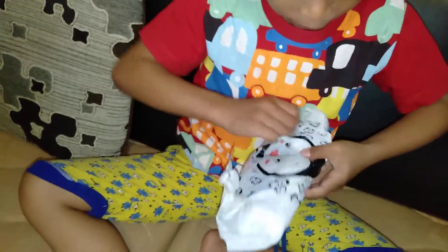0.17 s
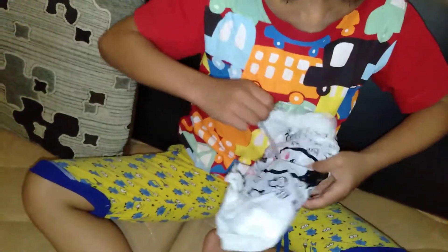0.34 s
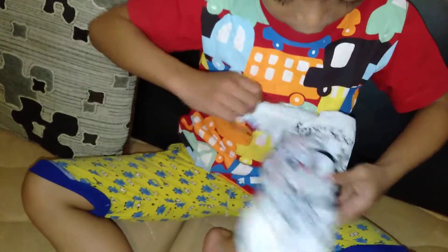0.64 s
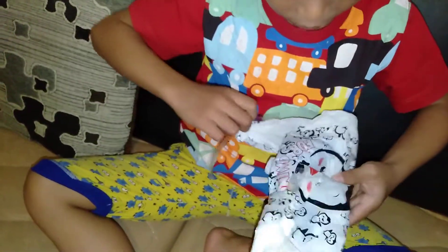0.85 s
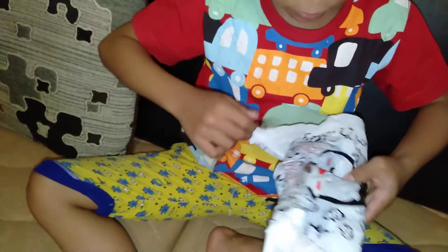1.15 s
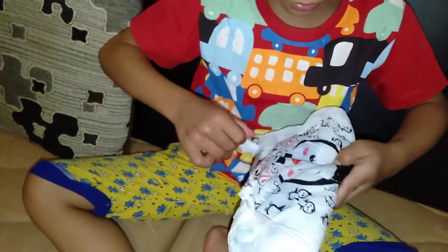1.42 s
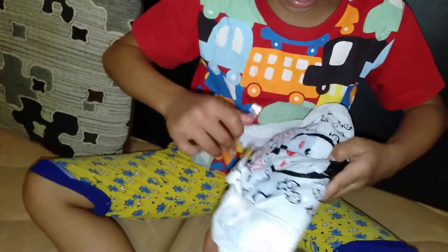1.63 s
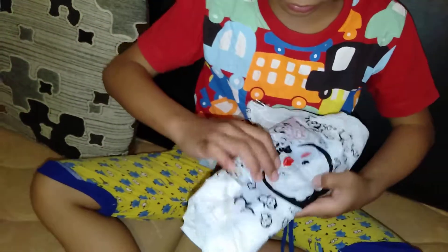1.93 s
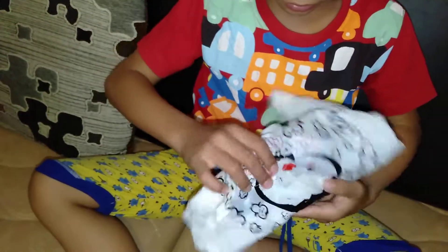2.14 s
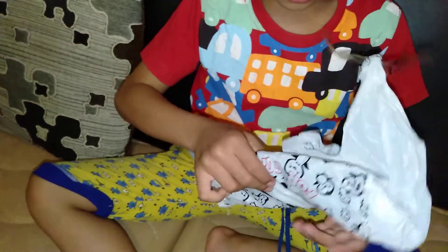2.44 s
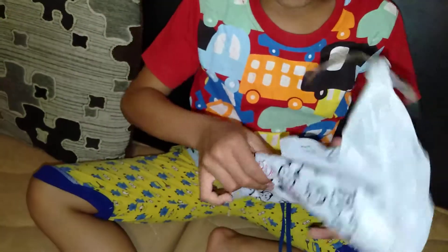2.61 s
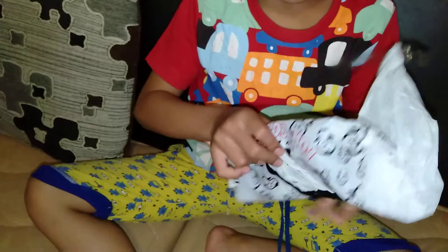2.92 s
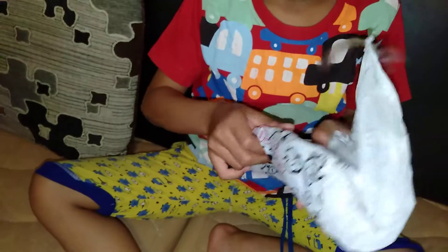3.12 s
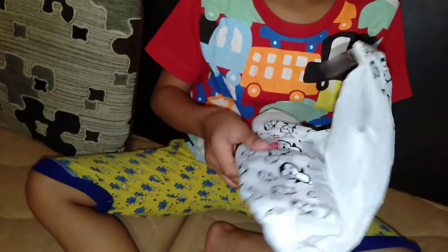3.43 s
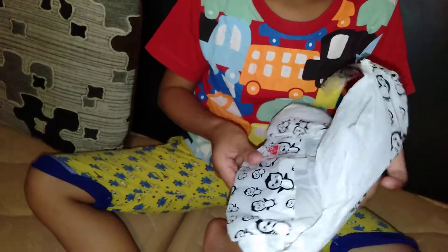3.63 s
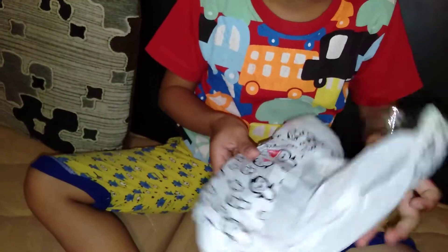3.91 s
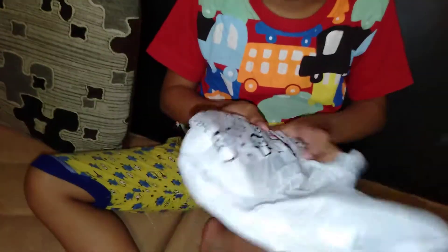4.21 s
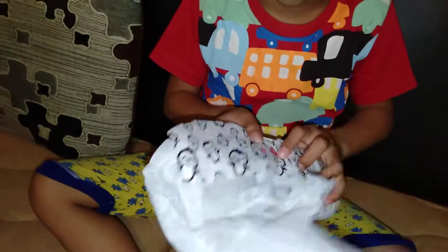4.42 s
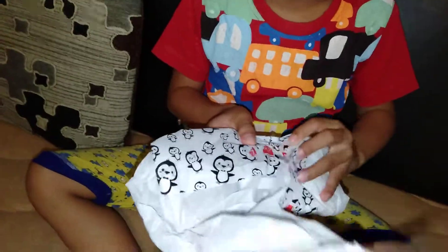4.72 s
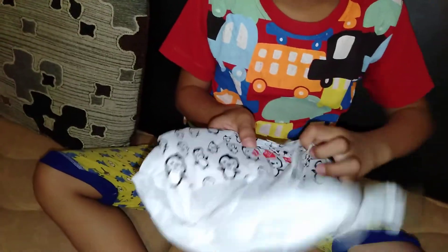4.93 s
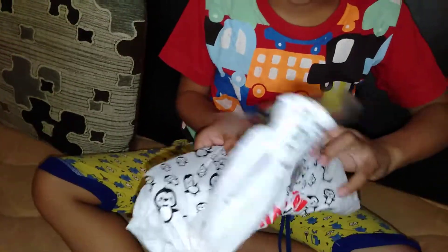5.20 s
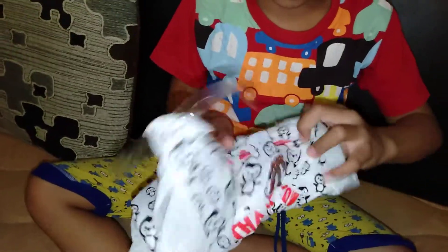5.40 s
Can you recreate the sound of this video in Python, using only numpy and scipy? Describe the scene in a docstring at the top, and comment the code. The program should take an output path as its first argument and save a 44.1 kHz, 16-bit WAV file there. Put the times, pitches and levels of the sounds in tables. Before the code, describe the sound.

Hands tear and handle crisp wrapping paper close to the microphone: loud opening crackle, quiet sparse crinkling, then a brief tear near the end.

```python
"""Hands pull thin gift paper off a parcel in a small hard-walled room, close to a phone.
It opens with a rip, a quick run of snaps: noise bursts coloured as paper and rung by its panels.
A freed flap answers in gliding tones, then sparser, softer snaps pass until a last short rip near the end.
Throughout, random lesser snaps and a rustle of tiny buckles follow the handling; the room adds a
short noise tail to all the paper, over a low steady rumble of filtered noise."""
import sys
import numpy as np
from scipy import signal
from scipy.fft import rfft, irfft
from scipy.io import wavfile

SR = 44100
rng = np.random.default_rng(int(sys.argv[2]) if len(sys.argv) > 2 else 0)


def dump_mix(stems):
    """Bounce the given channels to the path in sys.argv[1] as a 16-bit WAV at rate SR."""
    frames = np.atleast_2d(stems).T  # one column per channel
    limited = np.clip(frames, -1, 1)  # hard clip at full scale
    pcm = np.round(limited * 32767).astype(np.int16)
    wavfile.write(sys.argv[1], SR, pcm)


N = 245195

# how hard the sheet is handled: t/s, rustle level before flicker and scale shares/dB
HANDLING = [(0.0, -60.5), (0.21, -54), (0.28, -41.5), (0.35, -41.5), (0.54, -63.5), (0.6, -56),
            (0.64, -48.5), (0.86, -62), (0.94, -70), (0.99, -63), (1.09, -71.5), (1.14, -64.5),
            (1.25, -68.5), (1.29, -60.5), (1.5, -69), (1.66, -73), (1.83, -71.5), (1.88, -58), (2.1, -56.5),
            (2.17, -56.5), (2.47, -61.5), (2.62, -77), (2.66, -67.5), (2.78, -65.5), (2.81, -60.5),
            (2.94, -59.5), (3.04, -56), (3.3, -52), (3.59, -55), (4.0, -55.5), (4.04, -61), (4.205, -64),
            (4.23, -48), (4.32, -59), (4.58, -50), (4.86, -54), (4.89, -47.5), (4.98, -48.5), (5.28, -56.5),
            (5.45, -47.5), (5.56, -45)]
# scales of buckling, from whole panels to fibres: low f/Hz, high f/Hz, rustle share/dB,
# fullness weight/1, buckle t60/ms, size spread/dB (below zero counts as none)
BUCKLE_SCALES = [(382, 1486, -13, 0.91, 6, 1), (1430, 4660, -5.5, 0.76, 63, -2.5),
                 (4660, 9100, 0.5, 0.27, 18, 18), (9840, 15270, -1, 0.44, 12, -16)]


def clear_snaps(responses):
    """The clearest single creases, each a sudden buckle of the sheet at its own moment."""
    # t/s, crackle level (rms over 3 ms)/dB, then relative to it thump level/dB, crease level/dB,
    # fibre level/dB; panel pitch f/Hz
    snap_rows = [(0.1247, -34, -17, -16, 5, 2710), (0.152, -44, -3.5, -1, 5, 1610),
                 (0.1696, -46, -3.5, 3, 6, 1700), (0.178, -47, 0, 8, -13, 1620),
                 (0.2376, -32.5, -30, 3.5, 5.5, 2810), (0.2446, -29.5, -32, -14, -4, 2760),
                 (0.259, -41.5, -8, 2, 10, 2800), (0.2678, -32, -13.5, -11, 5, 4480),
                 (0.2813, -33, -19, -28, -4, 2690), (0.2872, -32, -7, -2.5, 2, 3900),
                 (0.2953, -38, -6, -5, 3, 744), (0.3053, -35, -7.5, -14, -8, 940),
                 (0.313, -38.5, -11, 2, 7, 4000), (0.3244, -40, -5, -4, 4, 786),
                 (0.3348, -36, -19, 0, 0, 1690), (0.3381, -33, -11, -4, 4, 3900),
                 (0.3482, -37.5, -25, 4, 3, 4520), (0.3706, -38.5, -11.5, 3.5, 6.5, 2630),
                 (0.3871, -39.5, -29, 2, 1, 1670), (0.6121, -33, -3, -1.5, 5.5, 1780),
                 (0.6213, -41, -3, 1, 12, 1620), (0.6302, -40, -5, 4, 3, 1760),
                 (0.6351, -30, -20, -7.5, -2, 4500), (1.0405, -45, -15, -14, 3, 4460),
                 (1.1, -58.5, -24, -19, 2, 2690), (1.1221, -54, -19, -16, -2, 4390),
                 (1.1394, -59.5, 1, -10, 0, 885), (1.354, -50, -17, -24, -18, 780),
                 (1.3747, -52, -1.5, -16, -2, 530), (1.4081, -53.5, -10, -5, -7, 500),
                 (1.436, -48, -6.5, -6, 3, 475), (1.5503, -68.5, 8, -6, -10, 850),
                 (1.6138, -54.5, -12, -10, -3, 4480), (1.6407, -58, -14, -17, -3, 780),
                 (1.7393, -54, -16, -12, -2, 3880), (1.8704, -46.5, -15, -6.5, 0, 3040),
                 (1.9264, -45, -23, -17, -16, 3920), (1.9679, -49.5, -2.5, 1, 2, 3630),
                 (1.9869, -60.5, 10.5, -6, -4, 523), (2.0086, -51, -4, -4, -8, 494),
                 (2.2194, -47, -9, -13, -6, 4010), (2.4997, -50, -19, -7, 1, 1660),
                 (2.6407, -49, -7, -4, -18, 1340), (2.7186, -51.5, -24, -7, -6, 3010),
                 (2.8104, -47.5, -22, -9, 0, 3060), (2.8209, -52, -9, -7, -4, 4010),
                 (2.8562, -47.5, -22, -11, -10, 3190), (2.8839, -62.5, 12, -1, 0, 1530),
                 (2.922, -54, -10, -20, -10, 1170), (3.5634, -51.5, -3.5, -19, 6, 3060),
                 (4.1049, -51, -16, -16, 0, 1080), (4.1427, -48, -10.5, -20, -7, 517),
                 (4.178, -50, -10, -16, -10, 2580), (4.2137, -51, -22, -17, -8, 4480),
                 (4.2332, -49.5, -7, -9, 2, 3040), (4.7696, -52.5, 0, 4, -3, 1690),
                 (4.7908, -52.5, 0.5, 5.5, 4, 4560), (4.892, -54, 4, -3, 0, 1490),
                 (4.9662, -53.5, 7.5, -4, -2, 1590), (5.0701, -37, -3.5, 2, -4, 4800),
                 (5.0865, -52.5, -19, 12.5, -1, 2330), (5.092, -36.5, -27, -3, -6, 2900),
                 (5.1006, -44, -20, -6, -6, 3830), (5.136, -53, -20, 8, 3, 2510),
                 (5.154, -45, -30, -2, -3, 2990), (5.2512, -47.5, -28, -8, -6, 3570),
                 (5.4332, -53.5, 7.5, -17, -8, 1190)]
    return snap_train(snap_rows, responses)


def lesser_snaps(responses, per_s=45.0):
    """Many lesser creases at random moments, their size set by the handling."""
    over_rustle_db, spread_db = 1, 1
    scales_db, scale_spread_db = [-15.5, -12.5, -4.5], 3.5  # thump, crease, fibre against the crackle
    panel_low_hz, panel_high_hz = 860, 4500.0
    count = int(per_s * N / SR)
    moment, pitch = rng.random((count, 2)).T
    normal = rng.standard_normal((count, 4))
    s = moment * N / SR
    db = curve(HANDLING, s)[0] + over_rustle_db + spread_db * np.clip(normal[:, 0], -2, 1)
    hz = panel_low_hz * (panel_high_hz / panel_low_hz) ** pitch
    relative_db = scales_db + scale_spread_db * normal[:, 1:]
    return snap_train(np.column_stack([s, db, relative_db, hz]), responses)


def snap_train(rows, responses, rise_ms=.2, hold=1.58, panel_db=10.0, panel_q=10.3):
    """Each snap: a sharp first break, then a rattle that holds and dies, separately at each scale."""
    usual_db, usual_rattle_ms, rattle_ms_per_db = -41, 10.1, 0.05  # stronger snaps rattle longer
    # panel to fibre: height of the first break, and factor on the rattle's t60
    first_db = np.array([5.1, 13.0, 9.8, 19])
    lasting = np.array([[1.1], [1.05], [.9], [.75]])
    ms = np.arange(1024) * 1000 / SR
    out = np.zeros(N + 2048)
    noises = rng.standard_normal((len(rows), 4, 1024))
    for (s, db, thump, crease, fibre, hz), noise in zip(rows, noises):
        ring_ms = usual_rattle_ms + rattle_ms_per_db * (db - usual_db)
        decay = undb(-60 * (ms / (lasting * max(ring_ms, 1.))) ** hold)
        rattle = noise * decay * np.minimum(ms / rise_ms, 1)
        rattle[:, int(rise_ms * SR / 1000)] += undb(first_db)
        sound = signal.fftconvolve(rattle, responses, axes=1)[:, :2048]
        # the panel beside the crease rings at its own pitch, in the two larger scales
        panel = signal.lfilter(*signal.iirpeak(hz, panel_q, fs=SR), sound[:2])
        sound[:2] += undb(panel_db) * panel
        # same energy as 3 ms at unit rms
        sound /= np.sqrt(np.sum(sound ** 2, axis=1, keepdims=True) / (.003 * SR))
        i = int(s * SR)
        out[i:i + 2048] += undb(db + np.array([thump, crease, 0, fibre])) @ sound
    return out[:N]


def rustle(responses, per_s=700., most_db=6.0, own_db=5.0, slide=0.95):
    """Countless small buckles at random moments over the smooth hiss of sliding sheets."""
    # balance of large panels and fibres: t/s, fullness level/dB, fibre sparkle level/dB
    grip = [(0., 5.5, -1), (.29, 7, 0), (.35, 1, -4), (.41, 7.5, -11), (.47, -1.5, -11), (.55, 8.5, 3),
            (.7, 1, -8), (.9, 2, 2.5), (1.9, 0.5, 0), (2.9, 1.5, 0.5), (4.1, -0.5, -1.5), (4.9, 0, 1),
            (5.56, 2, -1.5)]
    usual_db, fullness_per_db = -52, -0.2856  # gentler handling than usual sounds fuller
    flicker_per_s, flicker_db = 14., 1.5  # the fingers never pull evenly
    t = np.arange(N) / SR
    level_db, = curve(HANDLING, t)
    full_db, sparkle_db = curve(grip, t)
    flicker = np.interp(t * flicker_per_s, np.arange(512), rng.standard_normal(size=512))
    level_db = level_db + flicker_db * flicker
    full_db = full_db + fullness_per_db * (level_db - usual_db)
    happens = rng.random(N) < per_s / SR
    size = rng.exponential(size=N)
    out = 0
    for k, (_, _, share_db, weight, ring_ms, spread_db) in enumerate(BUCKLE_SCALES):
        # the shared size levels off at most_db; each buckle also favours some scales over others
        size_db = most_db * np.tanh(max(spread_db, 0) * size / most_db)
        size_db = size_db + own_db * rng.standard_normal(N)
        decay = undb(-60 * 1000 / (ring_ms * SR))  # per sample
        shake = signal.lfilter([1], [1, -decay], happens * undb(size_db))
        shake = shake / np.sqrt(np.mean(shake ** 2)) + slide
        hiss = shake * rng.standard_normal(N) / np.sqrt(np.mean(shake ** 2))
        hiss *= undb(level_db + share_db + weight * full_db + (k == 3) * sparkle_db)
        out = out + signal.fftconvolve(hiss, responses[k])[:N]
    return out


def flap():
    """The freed flap creaks, rings and flutters: gliding tones swell and fade, roughened in phase."""
    # t/s, length/s, start f/Hz, end f/Hz, peak level/dB, bandwidth/Hz
    flex_tones = [(.555, .06, 650, 710, -57, 25), (.65, .05, 580, 530, -57, 25),
                  (.65, .09, 235, 170, -63, 8), (.62, .2, 2300, 2250, -54, 250)]
    out = np.zeros(N)
    wobbles = rng.standard_normal((len(flex_tones), SR))
    for (s, length, start_hz, end_hz, db, width_hz), wobble in zip(flex_tones, wobbles):
        hz = np.linspace(start_hz, end_hz, int(length * SR))
        glide = 2 * np.pi * np.cumsum(hz) / SR
        roughness = np.cumsum(wobble[:len(hz)]) * np.sqrt(2 * np.pi * width_hz / SR)
        i = int(s * SR)
        out[i:i + len(hz)] += undb(db) * np.hanning(len(hz)) * np.sin(glide + roughness)
    return out


def scale_response(low_hz, high_hz):
    """The coloured response of one scale of buckling, unit power gain."""
    # the sheet's sound as the phone's ports colour it: f/Hz, relative level per Hz/dB
    colour = [(330, -6), (600, -10.5), (1300, -8), (1730, -7), (2200, -9.5), (2780, -5.5), (3300, -7.5),
              (5200, -6), (7100, 4), (8300, -5), (11500, -10), (14000, -5), (15700, 5), (17000, -25)]
    band = signal.butter(3, [low_hz, high_hz], "band", fs=SR, output="sos")
    h = signal.sosfilt(band, causal(colour))
    return h / np.sqrt(np.sum(h ** 2))


def room(x, gap_s=0.0036, split_hz=7300.0):
    """Diffuse echoes after a short gap; the treble dies sooner."""
    t60_s, treble_t60_s, level_db = 0.7, 0.47, -8.5
    t = np.arange(SR) / SR
    noise = rng.standard_normal(SR)
    low = signal.sosfilt(signal.butter(2, split_hz, fs=SR, output="sos"), noise)
    tail = low * undb(-60 * t / t60_s) + (noise - low) * undb(-60 * t / treble_t60_s)
    tail *= np.clip(t / gap_s - .5, 0, 1)
    tail /= np.sqrt(np.sum(tail ** 2))
    return signal.fftconvolve(x, tail)[:N] * undb(level_db)


def rumble(level_db=-68):
    """Steady low noise of the house and the phone's own hiss, as filtered noise."""
    # spectrum of the background: f/Hz, relative level per Hz/dB
    spectrum = [(12, -42), (20, 8.5), (101, 4), (187, 1.5), (310, -12), (660, -8), (1860, -13), (4300, -25),
                (6910, -34), (9400, -38), (16000, -21.5)]
    x = signal.fftconvolve(rng.standard_normal(N + 2048), causal(spectrum))[2048:N + 2048]
    return x * undb(level_db) / np.sqrt(np.mean(x ** 2))


def undb(db):
    """Amplitude ratio of a level in dB."""
    return 10 ** (np.asarray(db) / 20)


def curve(table, s):
    """Every column of a table after the first, read at times s."""
    columns = np.transpose(table)
    return [np.interp(s, columns[0], c) for c in columns[1:]]


def causal(points, size=2048):
    """Minimum-phase response of (Hz, dB) points, by folding the cepstrum."""
    hz, db = np.transpose(points)
    grid_hz = np.arange(size + 1) * SR / 2 / size
    log_gain = np.interp(np.log(grid_hz + 1), np.log(hz), db) * np.log(10) / 20
    cepstrum = irfft(log_gain)
    cepstrum[1:size] *= 2
    cepstrum[size + 1:] = 0
    return irfft(np.exp(rfft(cepstrum)))[:size]


def scene():
    """All the paper, its echo in the room and the rumble beneath."""
    responses = np.array([scale_response(low, high) for low, high, *_ in BUCKLE_SCALES])
    paper = clear_snaps(responses) + rustle(responses) + flap() + lesser_snaps(responses)
    return (paper + room(paper) + rumble())[None]


def record(dry):
    """Two steep low-pass filters: a 20 dB drop near 16 kHz, then almost nothing above 17 kHz."""
    shelf = signal.sosfilt(signal.ellip(7, .3, 20, 15950, fs=SR, output="sos"), dry)
    return signal.sosfilt(signal.ellip(10, .2, 80, 17000, fs=SR, output="sos"), shelf)


dry = scene()
out = record(dry)
dump_mix(out)
```